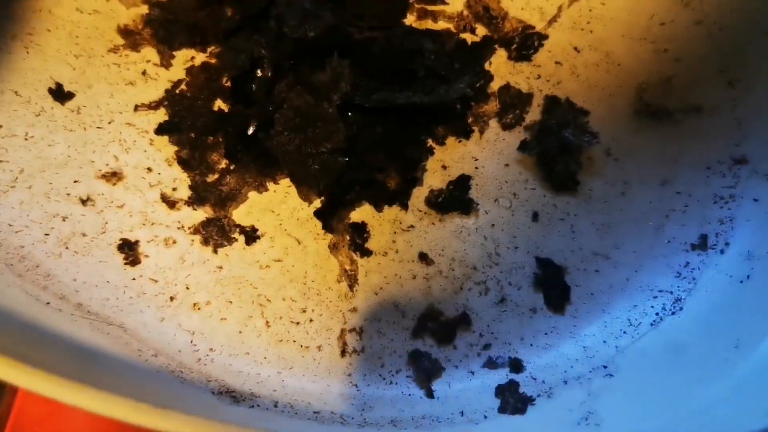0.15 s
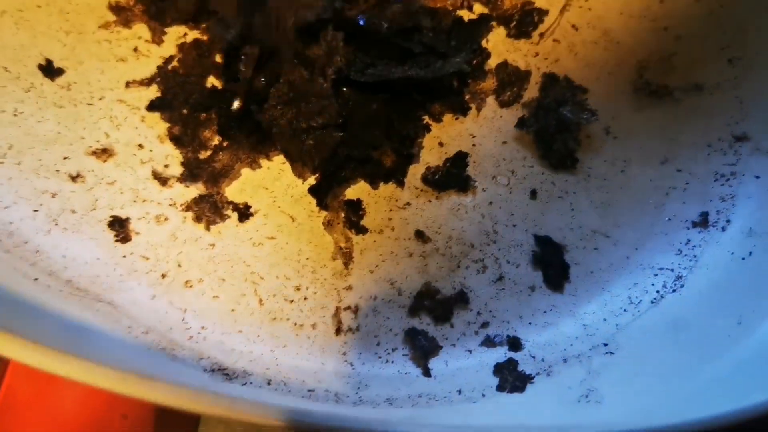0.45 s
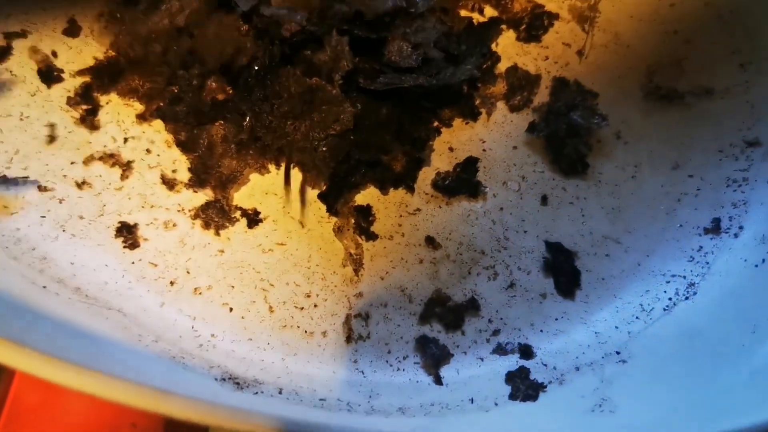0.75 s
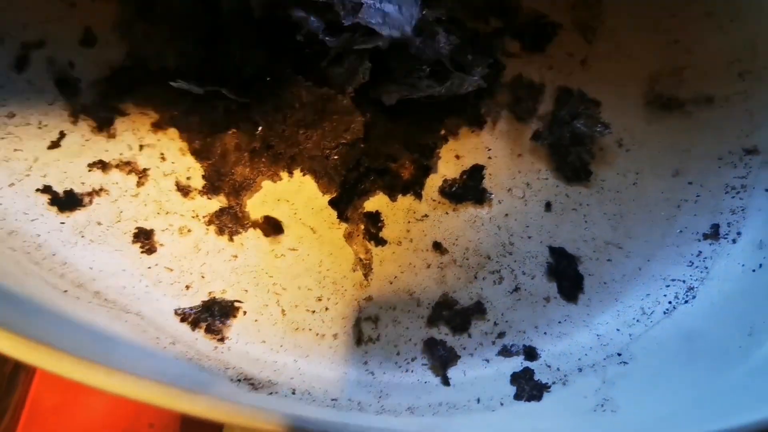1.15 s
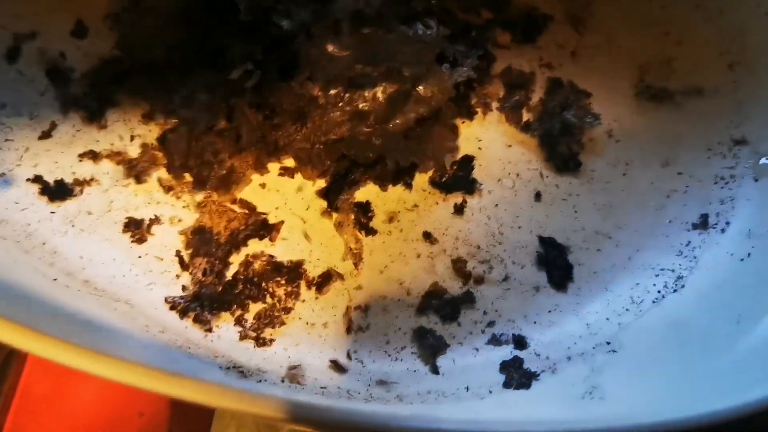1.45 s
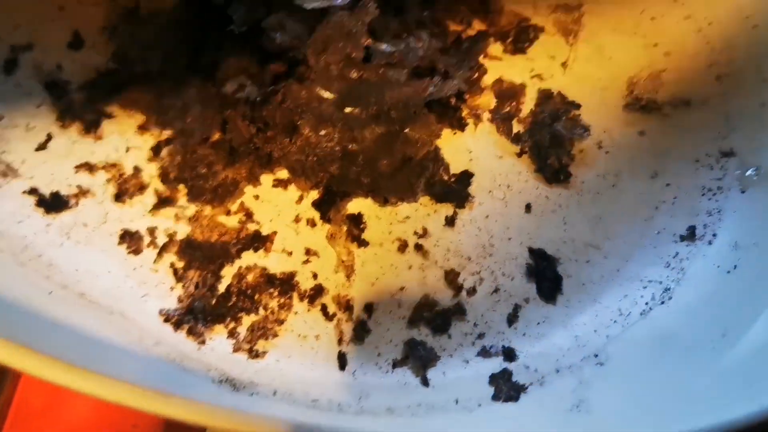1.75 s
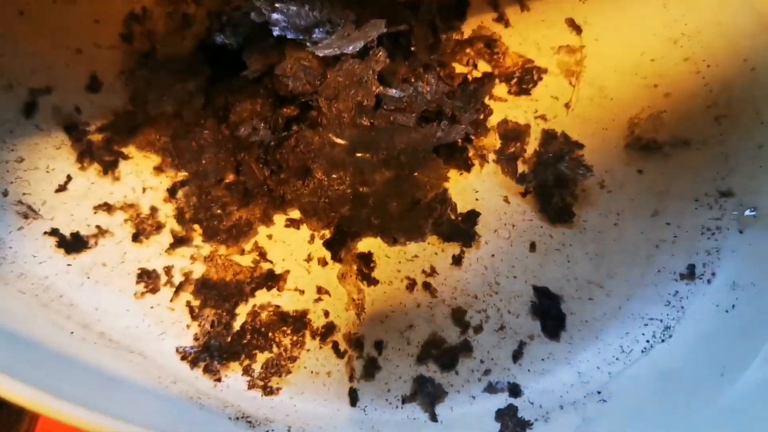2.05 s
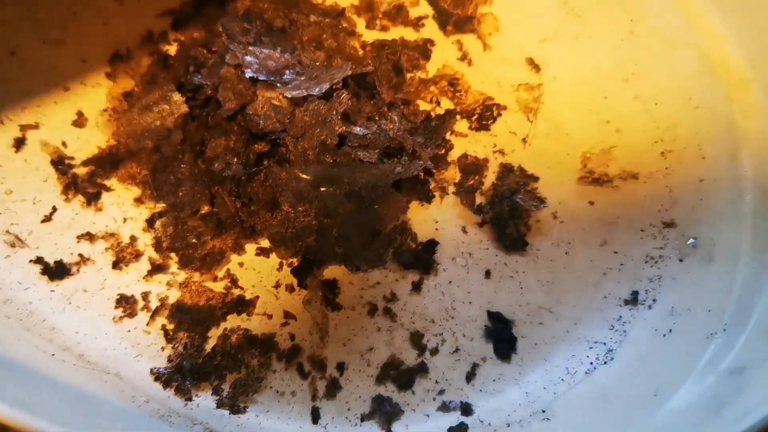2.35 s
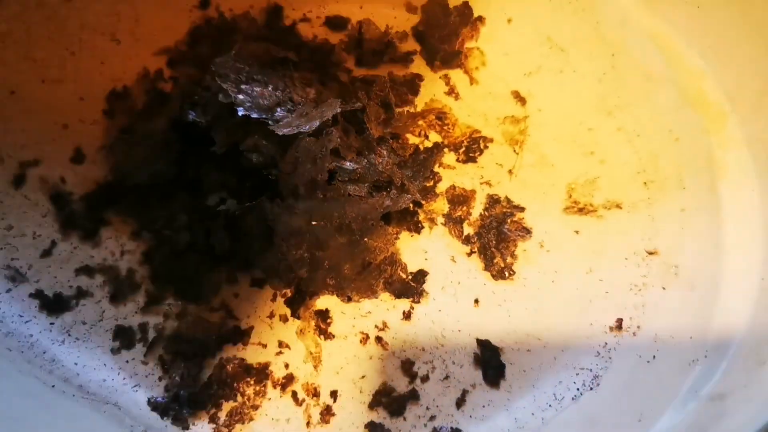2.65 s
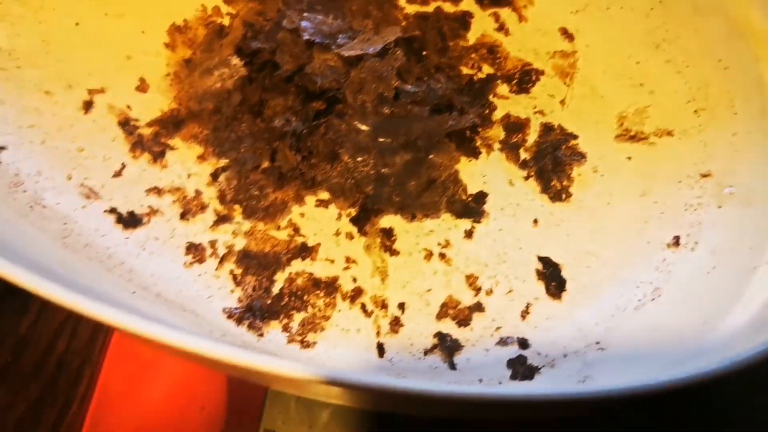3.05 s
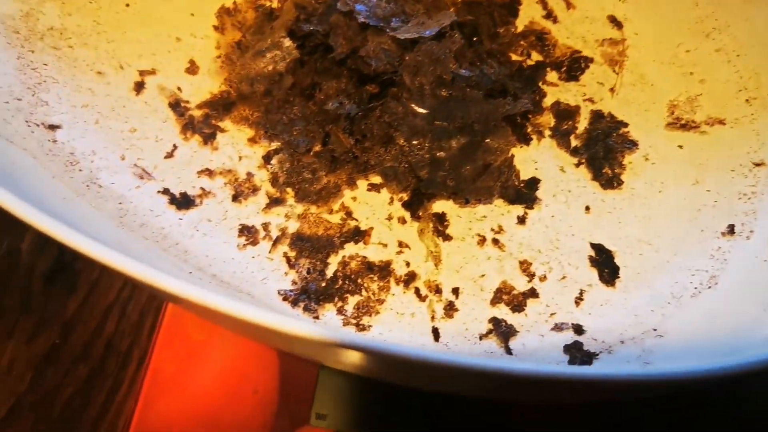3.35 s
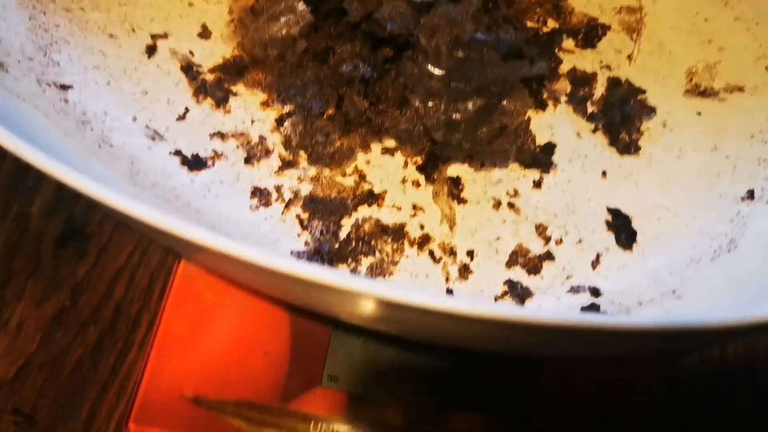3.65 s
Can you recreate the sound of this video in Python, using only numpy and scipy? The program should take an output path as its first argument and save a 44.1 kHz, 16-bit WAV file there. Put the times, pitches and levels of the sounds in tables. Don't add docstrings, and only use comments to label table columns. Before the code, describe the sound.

Dry flakes rustle and crackle in a bowl from the start, with brisk rubbing near 0.5-0.7 s and sharp snaps thickest at 1.0-1.6 s. Low hollow bowl bumps cluster around 1.1-1.3 s, over faint sliding hum and handling rumble. After 2 s it is nearly quiet, with soft case taps near 2.35 and 3.0 s. A very loud table knock hits at 3.57 s, bounces, then lands again at 3.75 s, ringing briefly.

```python
import sys
import numpy as np
from scipy import signal
from scipy.fft import rfft, irfft, next_fast_len
from scipy.io import wavfile
from scipy.ndimage import uniform_filter1d

SR = 44100
rng = np.random.default_rng(int(sys.argv[2]) if len(sys.argv) > 2 else 0)


def generate_wav(sig):
    pcm = np.round(np.clip(np.atleast_2d(sig).T, -1, 1) * 32767).astype(np.int16)
    wavfile.write(sys.argv[1], SR, pcm)


def linear_from_db(decibels):
    return 10 ** (np.asarray(decibels, float) / 20)


N = 167580
T = np.arange(N) / SR

# (frequency [Hz], level per Hz [dB])
ROOM_COLOUR = [(100, -6.5), (230, -5), (400, -11), (1000, -16), (2200, -16), (4200, -19.5), (7500, -29.5),
               (11000, -26.5), (15700, -26.5), (16300, -61)]
# (frequency [Hz], width [Hz], boost [dB])
ROOM_PEAKS = [(550, 160, 2.5), (1870, 110, 4.5), (2255, 220, 5), (4180, 590, 4)]
# (peak time [s], swell [s], fade [s], level [dB], extra level of dull part [dB])
RUB_STROKES = [(0.062, 0.14, 0.034, -52, -2.5), (0.119, 0.02, 0.072, -53, 0.5), (.36, 0.34, 0.71, -51, -4),
               (0.53, 0.056, 0.048, -42, -5), (.64, 0.079, 0.056, -38, -9), (0.739, 0.1, 0.23, -52.5, -6),
               (1.015, 0.015, 0.031, -47.5, -24), (1.111, 0.013, 0.19, -47.5, -2.5),
               (1.259, 0.17, 0.065, -48, 1), (1.358, 0.042, 0.16, -45, 2.5),
               (1.552, 0.013, 0.077, -54, 3.5), (1.734, 0.016, 0.037, -65, 4.5),
               (1.843, 0.031, 0.095, -60.5, 3), (3.05, 0.058, 0.042, -81, 10)]
# (frequency [Hz], level per Hz [dB])
FLAKE_COLOUR = [(700, -15), (1900, -5.5), (3200, -4.5), (5600, 0.5), (7200, -6.5), (9600, -15), (10700, -2),
                (15700, -7), (16300, -54.5)]
# (time [s], peak [dB], centre [Hz], crumb spray after it [dB], broad snap [dB])
CRACKS = [(0.115, -35, 5700, -13, -9), (0.136, -47.5, 5700, -26, -11), (0.2163, -46, 5360, -1, -7),
          (0.4832, -37, 11460, -13, -4), (0.5014, -28, 2270, -11, -4), (0.5474, -40, 6060, -22, -8),
          (0.588, -46, 4920, -15, -7), (0.625, -32, 5800, -8, -1), (0.691, -41, 2170, -28, -16),
          (0.7383, -38, 4300, -8, -12), (0.821, -38.5, 1550, -7, -2.5), (0.91, -42, 10800, -22, -6),
          (1.011, -30.5, 4020, -14.5, 0), (1.025, -43, 4000, -18, -6), (1.055, -41, 5100, -9, -4),
          (1.094, -39, 4300, -6.5, -4), (1.111, -36, 4650, -19, -9), (1.1628, -34, 10790, -26, -5),
          (1.182, -32, 5500, -9, -9), (1.2166, -37, 4110, -3.5, -1), (1.258, -41, 11000, -19, -1.5),
          (1.2895, -24, 12600, -16.5, 1), (1.335, -34.5, 11100, -14, -5.5), (1.3497, -35, 4980, -12, 0),
          (1.3593, -32, 4300, -8, -3), (1.413, -38, 6120, -15, -12), (1.528, -38, 12000, -12, -8),
          (1.536, -33, 4240, -23, -14), (1.547, -37, 4040, -20, -8), (1.585, -36, 5140, -12, -1),
          (1.667, -53, 11000, -20, -6), (1.693, -51.5, 4000, -12, -6), (1.709, -35, 3830, -17.5, -4),
          (1.773, -63, 4000, -17, 0), (1.812, -47, 10950, -6, -2), (1.908, -44.5, 4530, -28, 6),
          (2.0192, -51, 3380, -10.5, 8), (2.6283, -51.5, 990, -15.5, -4.5), (2.961, -58, 1890, -16, -22)]
# (frequency [Hz], level [dB], time to fall 60 dB [s])
BOWL_TONES = [(80.9, -1, 0.3), (137, -12.5, 0.38), (186.1, -2, 0.36), (230.3, 0, 0.45), (274, -16.5, .25),
              (388, -1.5, 0.12), (469.8, -12, 0.32), (567.4, -1.5, 0.15), (654, -24, 0.15), (763, -8, 0.16),
              (960, -5, 0.12), (1057, -1, 0.16), (1176, 0.5, 0.092), (1300, 3, 0.11)]
# (time [s], peak [dB], brightness [Hz])
BOWL_BUMPS = [(0.5003, -46, 1420), (.52, -57.5, 240), (1.077, -51.5, 500), (1.134, -36, 198),
              (1.156, -36, 236), (1.178, -32.5, 640), (1.215, -40, 400), (1.245, -39.5, 257),
              (1.265, -37, 300), (1.45, -50.5, 704), (1.606, -40.5, 655), (1.655, -52, 346),
              (1.83, -37, 1100), (1.859, -45.5, 500), (1.89, -45, 300), (1.954, -52.5, 890),
              (2.23, -61, 395), (2.361, -58, 242)]
# (peak time [s], swell [s], fade [s], level [dB])
SCRAPES = [
    (.05, 0.56, 0.53, -57),
    (.3, 0.35, 0.32, -59),
    (.53, 0.069, 0.081, -59),
    (1.3, 0.18, 0.38, -51),
    (1.47, 0.056, .25, -63),
    (1.9, 0.087, .5, -66),
]
# (time [s], length [s], rumble [dB])
GRIP_SHIFTS = [(0.113, 0.25, -64), (0.483, 0.34, -57.5), (0.86, 0.17, -54.5), (1.21, 0.11, -39),
               (1.424, 0.099, -43.5), (1.585, 0.034, -45), (1.682, 0.048, -44), (1.88, 0.1, -46.5),
               (2.287, 0.068, -60), (2.444, 0.076, -67), (2.994, 0.041, -61), (3, 2.9, -70)]
# (time [s], peak [dB], contact [ms])
FINGER_TAPS = [
    (2.319, -50, 4.5),
    (2.336, -51.5, 3.9),
    (2.344, -57, 1.9),
    (2.371, -49, 2.7),
    (2.382, -57, 5.1),
    (2.391, -49.5, 3.4),
    (2.66, -55.5, 1.15),
    (2.972, -38.5, 3),
    (2.997, -43.5, 4.1),
    (3.229, -57, 2.3),
]
# (frequency [Hz], level [dB], time to fall 60 dB [s])
TABLE_TONES = [(135.8, -1, 0.56), (183.4, -1.5, 0.45), (235.6, 6, 0.22), (308, -8.5, 0.44),
               (382.3, 7.5, 0.39), (486, 0.5, 0.65), (569.5, 0, 0.63), (765, 7.5, 0.12), (876, 3.5, 0.23),
               (935.5, 5.5, 0.25), (1050, 4.5, 0.17), (1127, 2.5, 0.26), (1245, 6.5, 0.26), (1345, 2, 0.16)]
# (time [s], peak [dB], brightness [Hz], crack [dB])
TABLE_KNOCKS = [
    (3.565, -6.5, 1560, -19.5),
    (3.608, -18.5, 490, -27),
    (3.7521, -15.5, 566, -17.5),
    (3.792, -25, 580, -17.5),
]
# (frequency [Hz], level per Hz [dB])
THUD_COLOUR = [(70, -44), (105, -26), (130, -11.5), (444, -9), (1120, -10.5), (1600, -24), (2500, -26),
               (5000, -49), (12000, -69), (22000, -120)]
# (frequency [Hz], time to fall 60 dB [s])
THUD_FADE = [(100, 0.85), (400, 0.45), (800, 0.15), (1500, 0.34), (3000, 0.36), (8000, 0.55)]
# (frequency [Hz], left minus right [dB])
KNOCK_PAN = [(100, 6.5), (380, 2), (900, 2), (2400, -4.5), (4400, -11), (8000, 4)]


def read(table, hz):
    a = np.array(table)
    return np.interp(np.log(hz), np.log(a[:, 0]), a[:, 1])


def shape(x, table):
    n = next_fast_len(x.shape[-1])
    hz = np.fft.rfftfreq(n, 1 / SR) + 1
    return irfft(rfft(x, n) * linear_from_db(read(table, hz)), n)[..., :x.shape[-1]]


def band(x, lo_hz, hi_hz):
    return signal.sosfilt(signal.butter(2, [lo_hz, min(hi_hz, .45 * SR)], "band", fs=SR, output="sos"), x)


def soft(x, hz):
    return signal.sosfilt(signal.butter(2, min(hz, .4 * SR), fs=SR, output="sos"), x)


def unit(x):
    return x / np.sqrt(np.mean(x ** 2))


def peak_one(x):
    return x / np.abs(x).max()


def fall(t, t60_s):
    return linear_from_db(-60 * t / t60_s)


def walk(rate_hz):
    k = int(SR / rate_hz)
    steps = np.repeat(rng.standard_normal(N // k + 1), k)
    return unit(uniform_filter1d(uniform_filter1d(steps, k), k)[:N])


def pair(make, alike):
    shared, left, right = make(), make(), make()
    return np.sqrt(alike) * shared + np.sqrt(1 - alike) * np.array([left, right])


def noise(length, alike):
    return pair(lambda: rng.standard_normal(length), alike)


def pan(db):
    return linear_from_db(np.array([[db / 2], [-db / 2]]) - abs(db) / 2)


def add(out, s, x):
    i = int(s * SR)
    out[:, i:i + x.shape[-1]] += x[..., :N - i]


def push(ms):
    return np.hanning(int(max(ms, .05) * SR / 500) + 3)


def ring(modes, hz, scatter_db, turn, rise_cycles):
    t = T[:SR // 2]
    a = np.array(modes)
    chance = rng.standard_normal((len(modes), 4))
    phase = 2 * np.pi * a[:, :1] * t + 3 * chance[:, 3:]
    phase = phase + turn * chance[:, 1:3].T[:, :, None]
    swell = 1 - np.exp(-t * a[:, :1] / rise_cycles)
    level = linear_from_db(a[:, 1:2] + scatter_db * chance[:, :1] - 60 * t / a[:, 2:])
    return peak_one(soft((level * swell * np.sin(phase)).sum(axis=1), hz))


def grains():
    struck = rng.random(N) < 2500 / SR
    size_db = 4.5 * np.minimum(rng.exponential(size=N), 3.2)
    return rng.standard_normal(N) * struck * linear_from_db(size_db)


def stroke(s, swell, fade, db):
    return linear_from_db(db - 15.36 * np.maximum((s - T) / swell, (T - s) / fade))


def effort(dull=0):
    return np.sqrt(sum(stroke(s, swell, fade, db + dull * dull_db) ** 2
                       for s, swell, fade, db, dull_db in RUB_STROKES))


def room():
    n = shape(noise(N, 0.088), [(40, -47)] + list(ROOM_COLOUR))
    n = n + sum((linear_from_db(db) - 1) * band(n, hz - w / 2, hz + w / 2) for hz, w, db in ROOM_PEAKS)
    return unit(n) * linear_from_db(-71 + 0.65 * walk(7.6))


def rustle():
    raw = unit(shape(pair(grains, 0.19) + 0.9 * rng.standard_normal((2, N)), FLAKE_COLOUR))
    centres = 1100 * 2. ** np.arange(0, 4.5, .75)
    quick = walk(110)
    bright_gain, dull_gain = effort(), effort(1)
    out = np.zeros((2, N))
    for hz in centres:
        hump = [(f, -11 * np.log2(f / hz) ** 2) for f in centres]
        patch = shape(np.roll(raw, int(hz), axis=1), hump)
        flutter = linear_from_db(1.94 * quick + 1.33 * walk(39.15))
        out += patch * flutter * (dull_gain if hz < 3500 else bright_gain) * linear_from_db(3.0)
    t = T[:SR // 8]
    for s, db, hz, spray_db, broad_db in CRACKS:
        n = noise(len(t), 0.54) * fall(t, 0.014) * np.minimum(t / 0.00063, 1)
        snap = band(n, hz / 1.12, hz * 1.16) * 2.84
        snap = snap + linear_from_db(broad_db) * band(n, min(hz / 1.7, 3000), 14000)
        i = int(s * SR)
        spray = linear_from_db(spray_db - 60 * t / 0.059) * raw[:, i:i + len(t)]
        add(out, s, linear_from_db(db) * (peak_one(snap) + spray))
    return out * pan(-5) * linear_from_db(2.5)


def bowl():
    out, t = np.zeros((2, N)), T[:SR // 2]
    for s, db, hz in BOWL_BUMPS:
        rattle = soft(band(noise(len(t), 0.54), 324, 2300), hz) * fall(t, 0.28)
        tones = ring(BOWL_TONES, hz, 3.2, 0.061, 0.36)
        add(out, s, linear_from_db(db + 3.5) * (tones + 0.95 * rattle))
    slide = sum(stroke(*row) for row in SCRAPES)
    snaps = grains()[None] * slide * linear_from_db(-27.5 + 2.5 * walk(25.1))
    hum = signal.fftconvolve(ring(BOWL_TONES, 830, 0, 0.13, 0.54), snaps)[:, :N]
    scratch = band(pair(grains, 0.78), 330, 1100) * slide * linear_from_db(5.5)
    return (out + hum + scratch) * pan(8.5)


def hand():
    def creep():
        low = band(rng.standard_normal(N), 13.6, 39.3)
        return low + 0.35 * band(rng.standard_normal(N), 57.2, 96.0)

    grip = sum(linear_from_db(db) * np.exp(-((T - s) / length) ** 2) for s, length, db in GRIP_SHIFTS)
    out = unit(pair(creep, 0.92)) * grip * linear_from_db(3.0 + walk(15)) * pan(10.5)
    for s, db, ms in FINGER_TAPS:
        x = band(np.pad(push(ms / 2), (0, 3000)), 29, 2500)
        skin = band(rng.standard_normal(len(x)), 330, 1640) * fall(T[:len(x)], 0.033)
        add(out, s, linear_from_db(db + 5) * peak_one(x + 0.45 * skin) * pan(-29.5))
    return out


def knocks():
    out, t = np.zeros((2, N)), T[:SR // 3]
    for s, db, hz, crack_db in TABLE_KNOCKS:
        n = unit(shape(noise(len(t), 0.38), THUD_COLOUR))
        dense = np.zeros((2, len(t)))
        for f in 125 * 2. ** np.arange(7):
            build_up = 1 - np.exp(-t * f / 0.6)
            dense += band(n, f / 1.48, f * 1.584) * fall(t, read(THUD_FADE, f)) * build_up
        crack = soft(band(noise(len(t), 0.43), 2300, 5300), 5600) * linear_from_db(crack_db - 60 * t / 0.053)
        clack = band(noise(len(t), 0.59), 590, 1405) * fall(t, 0.078) * np.minimum(t / 0.0031, 1)
        tones = ring(TABLE_TONES, hz, 1, 0.42, 1.35)[:, :len(t)]
        add(out, s, linear_from_db(db) * (tones * 0.38 + 0.29 * soft(dense, 4 * hz) + 2.0 * soft(clack, hz) + crack))
    since = T - TABLE_KNOCKS[0][0]
    crumbs = unit(band(pair(grains, .2), 9500, 15500)) * linear_from_db(-72.5 - 60 * since / 2.7) * (since > 0)
    thump = band(np.pad(push(6 / 2), (0, 4000)), 76, 300)
    add(out, 3.756, linear_from_db(-28) * peak_one(thump) * np.ones((2, 1)))
    left, right = out + crumbs
    return np.array([shape(left, [(f, db / 2) for f, db in KNOCK_PAN]),
                     shape(right, [(f, -db / 2) for f, db in KNOCK_PAN])])


def scene():
    near = rustle() + bowl() + hand() + knocks()
    left_lead_s = .0002
    near[1] = np.roll(near[1], round(left_lead_s * SR))
    return near + room()


def roll_off(x):
    return signal.sosfilt(signal.butter(12, 16910, fs=SR, output="sos"), x)


def record(dry):
    return roll_off(dry)


dry = scene()
out = record(dry)
generate_wav(out)
```